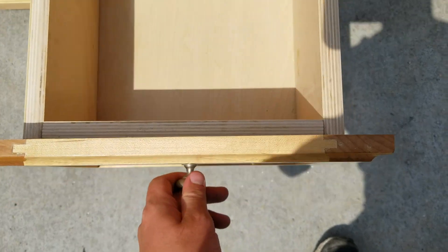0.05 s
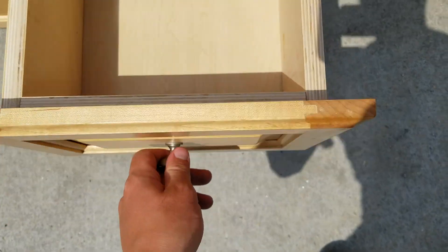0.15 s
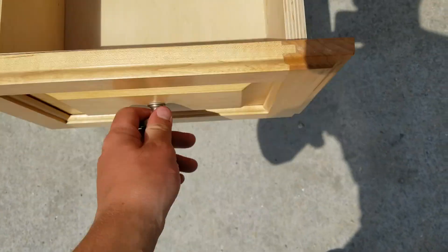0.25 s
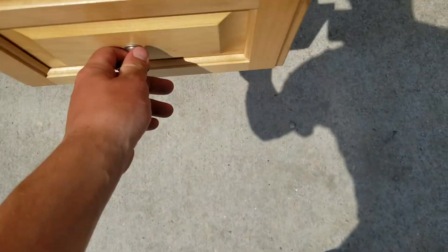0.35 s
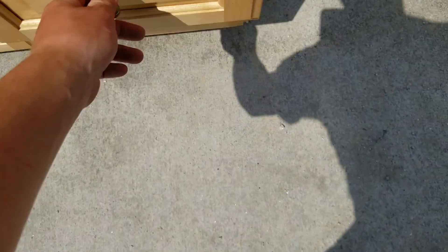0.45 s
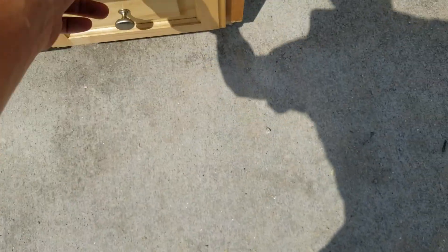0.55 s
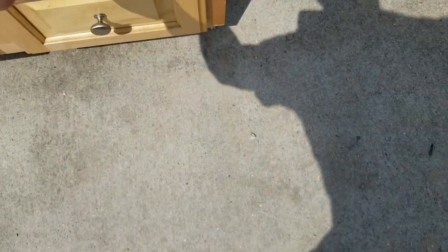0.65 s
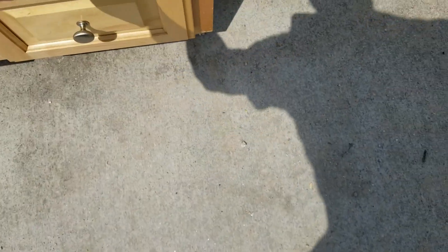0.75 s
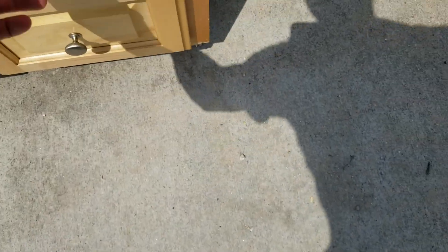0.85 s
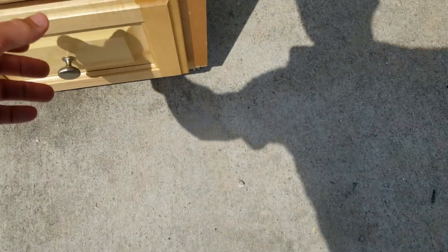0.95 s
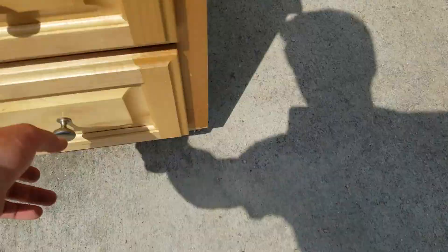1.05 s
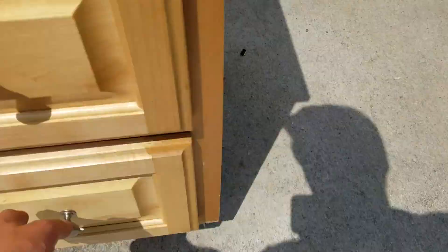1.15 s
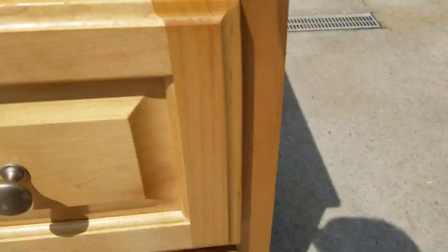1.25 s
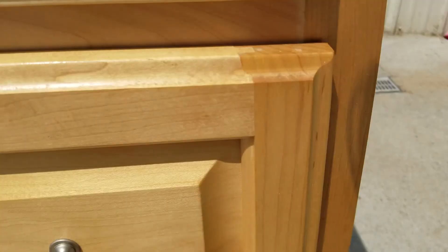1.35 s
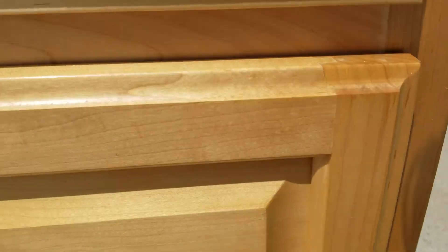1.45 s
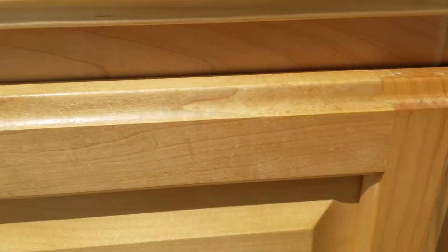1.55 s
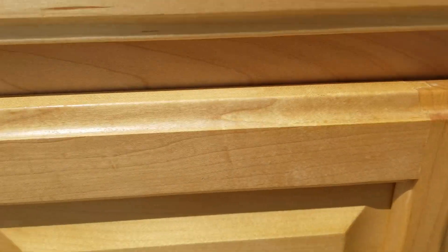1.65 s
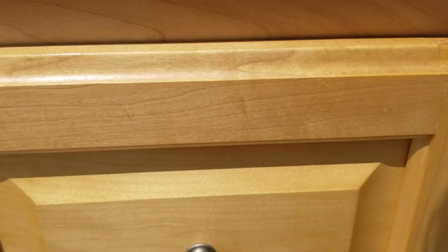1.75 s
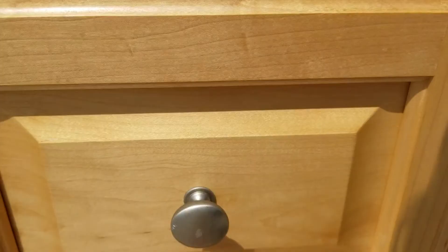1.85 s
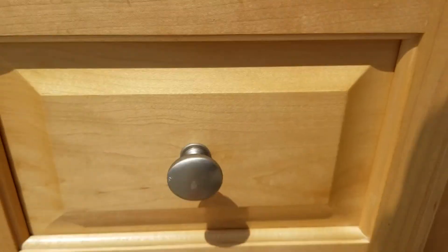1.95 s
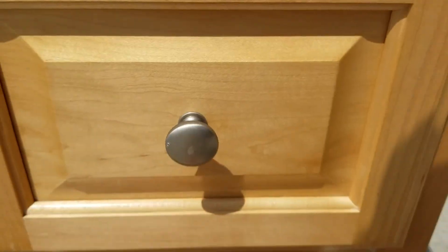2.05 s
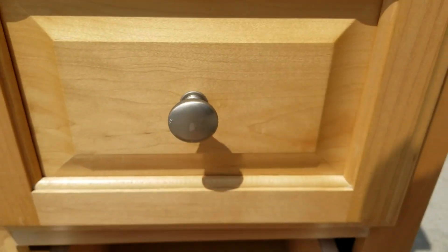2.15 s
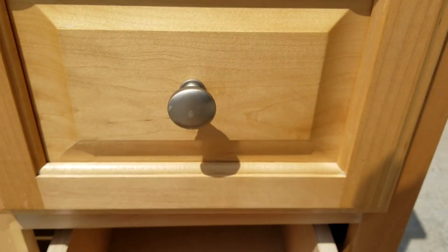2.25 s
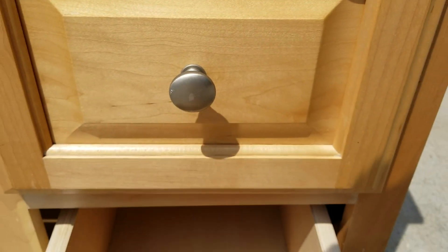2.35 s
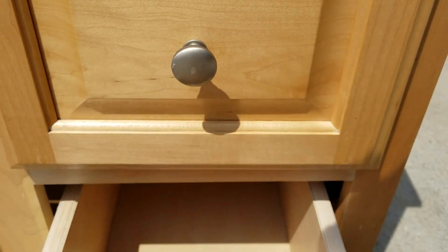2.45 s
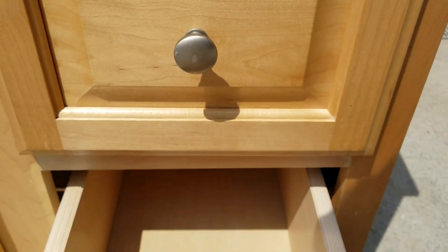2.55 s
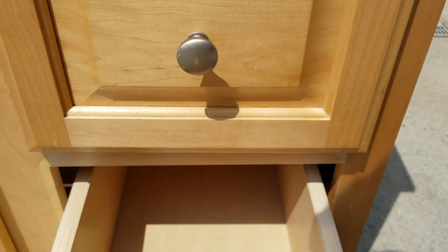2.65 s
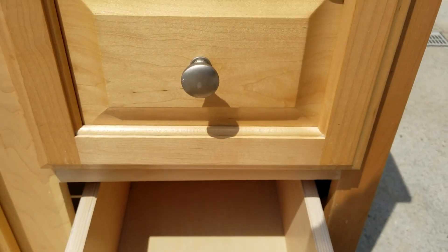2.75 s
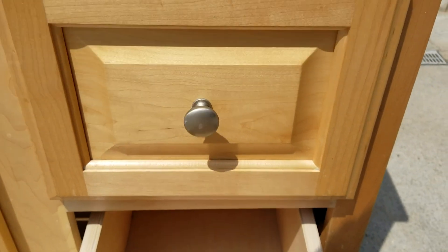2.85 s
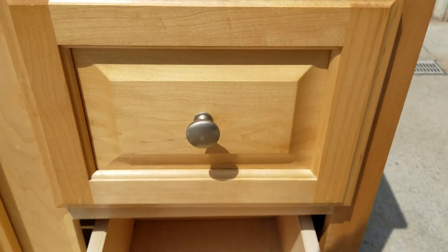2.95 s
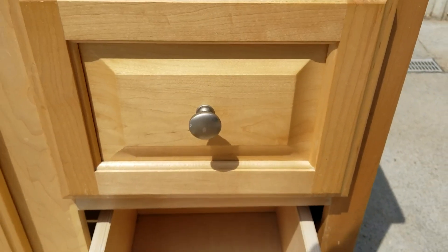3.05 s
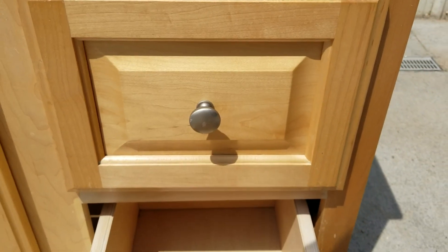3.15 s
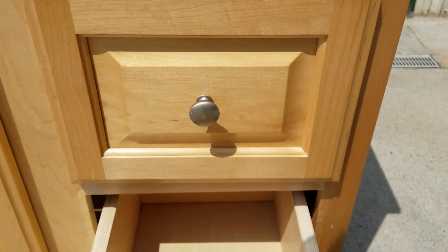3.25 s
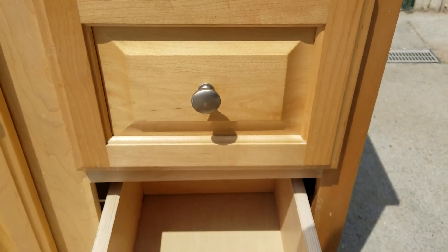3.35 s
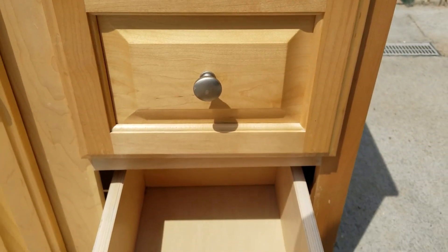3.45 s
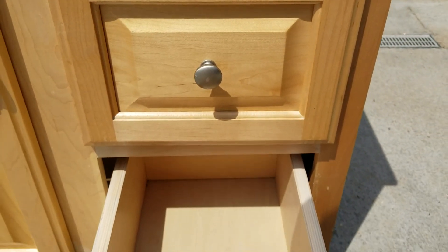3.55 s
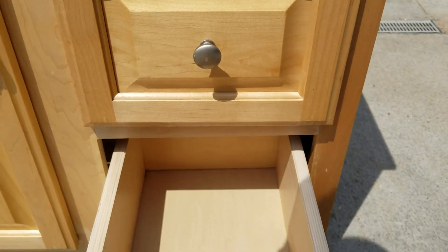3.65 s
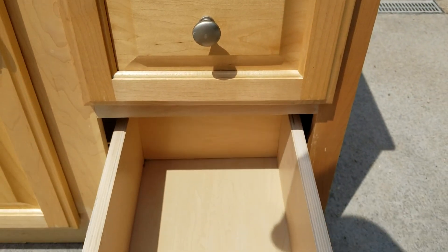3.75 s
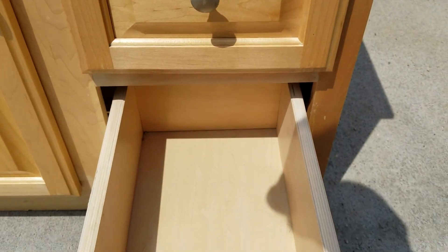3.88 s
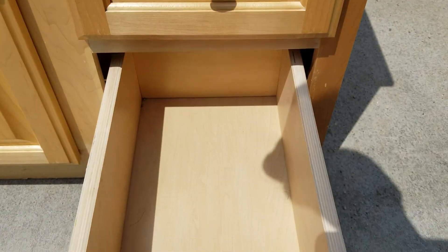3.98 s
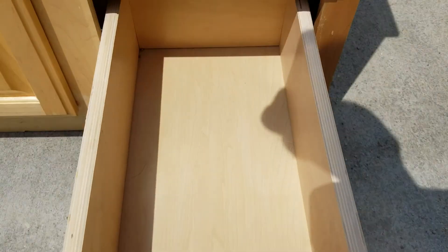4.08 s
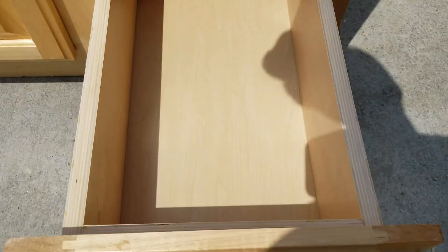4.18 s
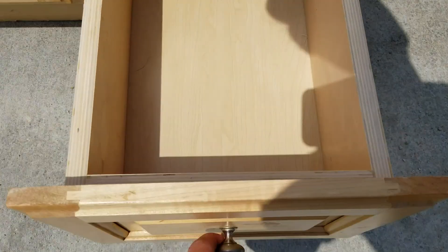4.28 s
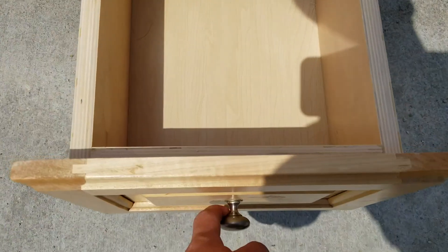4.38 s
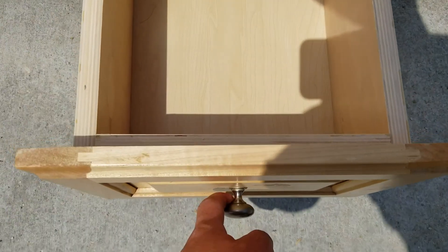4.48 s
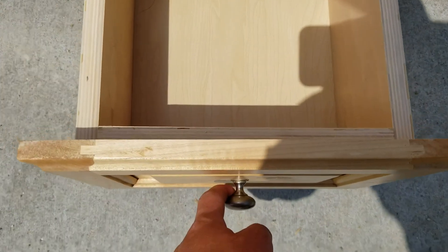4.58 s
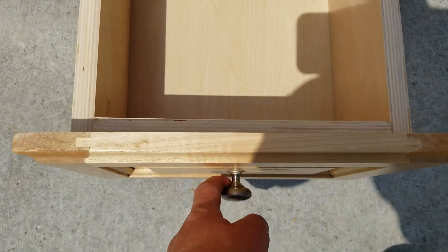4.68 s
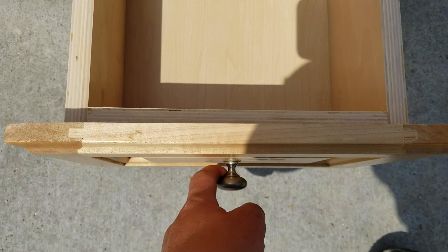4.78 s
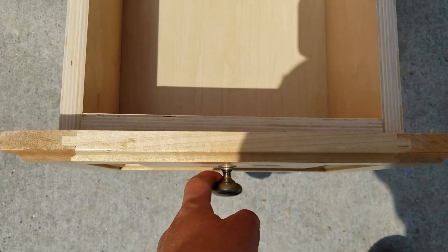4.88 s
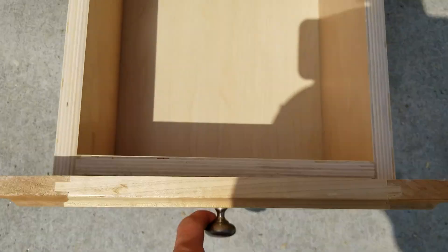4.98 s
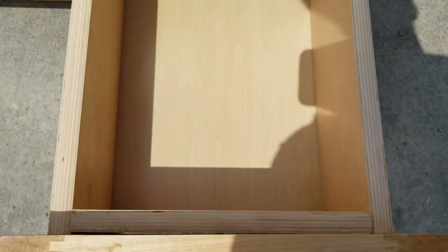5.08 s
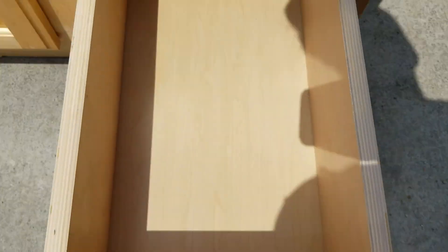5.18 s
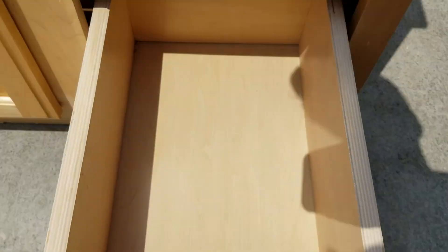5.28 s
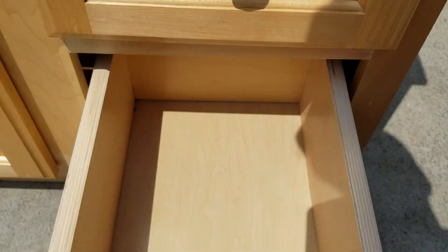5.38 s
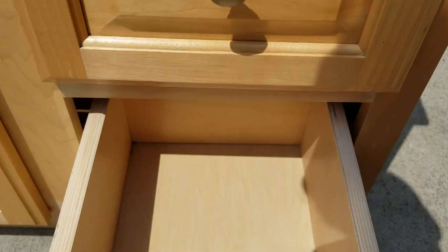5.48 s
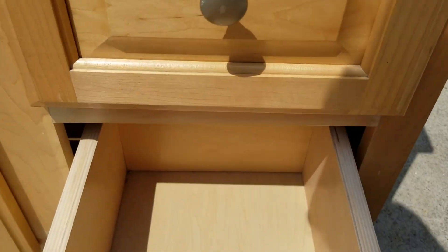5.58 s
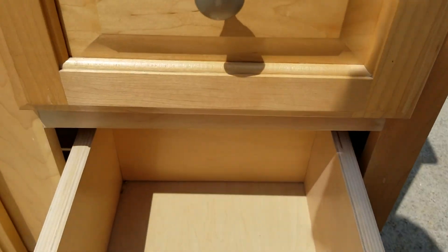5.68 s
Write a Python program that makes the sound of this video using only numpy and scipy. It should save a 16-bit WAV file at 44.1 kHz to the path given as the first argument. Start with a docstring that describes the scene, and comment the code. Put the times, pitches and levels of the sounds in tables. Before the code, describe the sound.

From the start, a wooden cabinet drawer scrapes inward, catching and rasping harder at about 0.3 seconds. At about 0.7 seconds it slams shut with a quick cluster of loud knocks and a short, low shudder, faintly echoed by the yard. Air buffets the microphone in low lumps until about 1.4 seconds, and fingers tap and rub close to it from 1 to 1.4 seconds. After a small scuff near 1.7 seconds, a lower drawer is drawn out from 2 seconds, gliding softly with little snags until about 2.8. It rests, then is pulled further from 3.5 to 4 seconds with a rumbling scrape, several wooden knocks over its stops and a tiny squeak. A few light clicks follow between 4.4 and 5.6 seconds, with a soft bump and rub near 5.5. Faint, steady outdoor noise lies underneath throughout.

```python
"""A top drawer scrapes inward, binds halfway and slams shut: a wooden cabinet, outdoors on concrete.
The wood catches and slips, each blow rings the cabinet, and the yard's walls answer faintly from a way off.
Fingers tap and rub close to the microphone, and air buffets it as it moves. Then a lower drawer is drawn
out, glides, rests, and is pulled on over its stops. Distant outdoor noise lies under it all."""
import sys
import numpy as np
from scipy import signal
from scipy.fft import rfft, irfft
from scipy.io import wavfile
from scipy.ndimage import uniform_filter1d

SR = 44100
rng = np.random.default_rng(int(sys.argv[2]) if len(sys.argv) > 2 else 0)


def unload_wav(signal):
    """Save mono or channel-first audio to the path in sys.argv[1] as 16-bit WAV at rate SR, clipped to [-1, 1]."""
    wavfile.write(
        sys.argv[1],
        SR,
        np.round(np.clip(np.atleast_2d(signal).T, -1, 1) * 32767).astype(np.int16),
    )


N = 252252

# How hard the hand drives each stroke. Each row: time in seconds, effort in dB.
PUSH_EFFORT = [(0, -43.5), (0.12, -38), (0.18, -33.5), (0.31, -33.5), (0.42, -36), (0.55, -41), (0.61, -42),
               (0.635, -47.5)]
DRAW_EFFORT = [(1.98, -61.5), (2.13, -46.5), (2.25, -44.5), (2.30, -47), (2.36, -39.5), (2.40, -47.5)]
GLIDE_EFFORT = [(2.41, -50), (2.62, -51), (2.78, -53)]
RUN_OUT_EFFORT = [(3.57, -55), (3.62, -47), (3.69, -45), (3.73, -34.5), (3.78, -42.5), (3.81, -30.5),
                  (3.86, -34.5), (3.92, -43), (4.05, -64)]
# Spectra of the strokes. Each row: frequency in Hz, relative density in dB.
PUSH_SPECTRUM = [(41, -39), (70, -4.5), (161, -1.5), (193, -2), (467, -9), (599, -2.5), (734, -19),
                 (920, -11), (1130, -20.5), (2030, -23), (3650, -37), (6140, -47), (7520, -60),
                 (10300, -46.5), (15500, -60.5)]
DRAW_SPECTRUM = [(47, -38), (80, -16), (133, -1.5), (216, -15), (257, -3), (436, -5), (556, -4),
                 (621, -2.5), (709, -13.5), (1050, -6), (1290, -14), (2040, -18), (6560, -42.5),
                 (7490, -55), (15500, -56)]
RUN_OUT_SPECTRUM = [(40, -21), (75, -4), (115, -5), (200, -10.5), (270, -2.5), (325, -10), (430, -1.5),
                    (540, -9.5), (780, -19), (1050, -19.5), (1400, -22.5), (2200, -23), (3400, -29.5),
                    (4200, -37), (7500, -48.5), (10000, -40), (15500, -43)]
# Resonances of the drawer boxes. Each row: frequency in Hz, width in Hz, lift in dB.
TOP_BOX_MODES = [(200, 21, 6), (268, 36, 9.5), (510, 11, 3), (613, 35, 5.5), (890, 59, 6.5),
                 (1300, 140, 5.5), (2050, 30, 6.5), (2330, 60, 5)]
LOWER_BOX_MODES = [(126.4, 8.3, 4.4), (261.6, 37, 5.26), (380, 43, 1.6), (429, 130, 6), (620, 20, 10.6),
                   (1105, 160, 7.7), (2020, 83, 8.4)]
# Spectra of the far background, air on the microphone, the yard's echo, struck panels and rubbed skin.
# Each row: frequency in Hz, relative density in dB.
AIR_SPECTRUM = [(15, -55.5), (25, -14), (69, -3), (140, -6.5), (178, -10.5), (246, -6), (281, -12),
                (433, -6), (848, -15), (919, -16), (1020, -14.5), (1270, -23), (2770, -26.5), (3930, -38),
                (7500, -43.5), (13500, -35.5), (15500, -41.5)]
BUFFET_SPECTRUM = [(20, -7.5), (45, -2), (75, 1.5), (130, -6), (220, -11), (500, -19.5), (1500, -64.5)]
YARD_SPECTRUM = [(60, -9), (250, -2), (1000, -2.5), (2500, -13.5), (5000, -3.5), (8000, 2.5), (15000, -8)]
PANEL_SPECTRUM = [(200, -12), (500, -2.5), (1050, 2), (1550, -2.5), (1950, 4), (2200, 2), (2500, 6),
                  (2950, 3), (3250, -3), (4050, -8.5), (4900, -5.5), (5700, -8.5), (6600, -16), (7500, -33),
                  (9200, -18.5), (12000, -25), (16000, -27)]
RUSTLE_SPECTRUM = [(200, -3), (700, -1), (1500, 1.5), (2700, -6.5), (4000, -12.5), (6000, -15), (8000, -26),
                   (12000, -14.5), (16000, -27.5)]
# How alike left and right are at the microphone. Each row: frequency in Hz, correlation.
WOOD_LIKENESS = [(60, 0.86), (300, 1), (700, 0.87), (1400, 0.35), (3000, 0.27), (15000, 0.084)]
AIR_LIKENESS = [(60, 0.61), (180, 0.96), (550, 0.42), (1650, -0.074), (4970, -0.46), (15000, -0.39)]
BUFFET_LIKENESS = [(20, .3), (70, 0.53), (200, 1), (1500, .5)]
# Decay of the echo and of the panels. Each row: frequency in Hz, seconds to fall 60 dB (t60).
YARD_DECAY = [(100, 0.18), (500, 1.1), (1200, 1), (3000, 2.5), (6000, 0.11), (14000, 0.2)]
PANEL_DECAY = [(300, 0.12), (1000, .1), (2500, 0.028), (5000, 0.031), (10000, 0.024), (16000, 0.024)]
# Gusts on the microphone and skin rubbing beside it. Each row: start and length in seconds, level in dB.
MIC_GUSTS = [(0, 1.415, -44.5), (5.49, 0.042, -57.5), (5.68, 0.04, -62.5)]
SKIN_RUBS = [(0.84, 0.18, -73), (1.03, 0.25, -55.5), (1.291, 0.064, -46), (5.486, 0.034, -53)]
# Dry taps of fingers, knob and runners. Each row: start in seconds, peak in dB before panning,
# pitch in Hz, chatter t60 in seconds, left over right in dB.
CLOSE_TAPS = [(0.07, -36, 650, 0.018, -12), (0.1165, -31, 1620, 0.037, -2), (0.432, -31, 6100, 0.029, -3),
              (0.5735, -18, 503, 0.065, 2), (0.609, -28.5, 540, 0.032, 0), (1.0381, -40, 2480, .015, -7.5),
              (1.0484, -24.5, 323, 0.0068, -17), (1.0698, -35, 2470, 0.0026, 9),
              (1.2052, -37.5, 2550, 0.045, 3), (1.2154, -22.5, 1070, 0.02, 0),
              (1.2863, -22, 2500, 0.016, 5), (1.299, -25, 560, 0.0072, 4), (1.336, -27.5, 2400, 0.012, 0),
              (1.3462, -17.5, 606, 0.012, 4), (1.3696, -35.5, 2620, 0.026, -1.5),
              (1.9364, -38, 1270, 0.017, -0.5), (2.313, -37.5, 2400, 0.02, 3),
              (3.6195, -31.5, 2144, 0.066, -3), (3.8290, -32, 3260, 0.079, -7),
              (4.3522, -50, 2094, 0.022, 2), (5.0510, -38, 2007, 0.044, 1.5), (5.1756, -47, 2146, .025, -4),
              (5.3853, -48, 1694, 0.016, 0.5), (5.4986, -44.5, 1880, .005, -5),
              (5.522, -49, 900, 0.0088, 0), (5.624, -38.5, 1290, 0.014, -5.5)]
# The cabinet's low modes. Each row: frequency in Hz, relative level in dB, t60 in seconds.
CABINET_MODES = [(62.2, -21.5, 0.049), (105, -7.5, 0.17), (121, -5, 0.67), (147.2, -4.5, 0.2),
                 (184.3, 1.5, 0.12), (235.2, -14.5, 0.51), (262, -3.5, 0.14), (334, 0.5, 0.066),
                 (393, -7, 0.063), (478.1, -8, 0.39), (520, -16, 0.13), (562, -21, 0.099), (588, -16, 0.21),
                 (719, -17.5, .2), (828, -24, 0.5), (955, -13.5, 0.11), (1026, -21, .18)]
# Blows on runners and stops. Each row: start in seconds, ring and crack gains in dB, treble cutoff in Hz.
DRAWER_BLOWS = [(0.292, -30, -25, 1200), (0.5716, -31.5, -21, 1380), (0.6592, -12.5, -9, 14000),
                (0.668, -28, -17.5, 4500), (0.6806, -16.5, -16.5, 2860), (0.6936, -14, -13, 3520),
                (0.7215, -34, -19, 1520), (3.47, -39.5, -43, 1160), (3.6189, -48, -33.5, 9100),
                (3.713, -39, -27.5, 1660), (3.757, -44, -29, 1210), (3.7885, -26, -26, 2300),
                (3.826, -41.5, -31.5, 13000), (3.831, -29.5, -27.5, 3720), (3.862, -37, -38, 1980),
                (5.499, -43.5, -53, 2500)]
# Snags of the lower drawer. Each row: start and length in seconds, scrape, rumble and rasp gains in dB.
DRAWER_SHIFTS = [(1.677, 0.12, -47.5, -50.5, -58.5), (2.429, .03, -56, -45, -62),
                 (2.528, .025, -44.5, -55, -81), (2.585, 0.032, -43, -51, -70),
                 (2.74, 0.055, -47, -67, -58), (3.47, 0.077, -49, -50.5, -63),
                 (3.63, 0.051, -47, -36, -48.5), (3.979, 0.026, -38, -48.5, -91)]
# Partials of the runner's squeak. Each row: start and length in seconds, pitch in Hz, level in dB.
SQUEAK_PARTIALS = [(3.915, 0.02, 3370, -50.5), (3.916, .02, 4550, -63)]


def amp(db):
    """Decibels to gain."""
    return 10 ** (np.asarray(db) / 20)


def unit_rms(x):
    """Scales to rms 1."""
    return x / np.sqrt(np.mean(x ** 2) + 1e-20)


def read(points, hz):
    """Reads a table on a log-frequency axis."""
    f, value = np.transpose(points)
    return np.interp(np.log(hz + 1), np.log(f + 1), value)


def bins(x):
    """Frequencies of the spectrum of x."""
    return np.fft.rfftfreq(x.shape[-1], 1 / SR)


def shaped(x, gain):
    """Filters with one gain per frequency."""
    return irfft(rfft(x) * gain, x.shape[-1])


def cut(x, hz, kind, order=2):
    """Causal low-pass or high-pass."""
    return signal.sosfilt(signal.butter(order, min(hz, SR / 2 - 1), kind, fs=SR, output="sos"), x)


def pan(db):
    """Stereo gains, left over right by db."""
    return amp(np.array([[db], [-db]]) / 2)


def add(mix, s, sound):
    """Mixes a stereo sound in at s seconds."""
    part = mix[:, max(round(s * SR), 0):][:, :sound.shape[1]]
    part += sound[:, :part.shape[1]]


def noise(spectrum, likeness, size):
    """Coloured stereo noise, partly alike in both channels."""
    left, other = rng.standard_normal((2, size))
    hz = bins(left)
    same = np.clip(read(likeness, hz), -1, 1)
    right = shaped(left, same) + shaped(other, np.sqrt(1 - same ** 2))
    return unit_rms(shaped(np.array([left, right]), amp(read(spectrum, hz))))


def wobble(size, span):
    """A random curve of rms 1, smoothed over span points."""
    return unit_rms(uniform_filter1d(rng.standard_normal(size), size=span))


def decay(t, t60):
    """Gain that falls 60 dB in t60 seconds."""
    return np.exp(-np.log(1000) * t / t60)


def dying(x, t60_table, count=9):
    """Lets every band of x die away at its own speed."""
    t, centres = np.arange(x.shape[1]) / SR, np.geomspace(60, 16000, count)
    bands = (shaped(x, read(np.c_[centres, share], bins(x))) for share in np.eye(count))
    return sum(band * decay(t, read(t60_table, hz)) for band, hz in zip(bands, centres))


def swells(rows, attack_s, release_s):
    """Gain that rises just before each event, holds for its length and dies away."""
    t, gain = np.arange(N) / SR, np.zeros(N)
    for s, length, db in rows:
        rise = np.clip(1 + (t - s) / attack_s, 0, 1)
        gain += amp(db) * rise * np.exp(-np.maximum(t - s - length, 0) / release_s)
    return gain


def slide(stroke, spectrum, box, scrape_db, rumble_db, rasp_db, slips_per_s, spread_db, catch_db,
          rasp_follow=1, boom_db_per_s=0, binds=False, bind_s=0.285, attack_s=0.0024, release_s=0.05):
    """Wood catches and slips on wood: uneven clicks ring the drawer box. Returns start and sound."""
    times, effort_db = np.transpose(stroke)
    start, end = times[0], times[-1]
    t = start + np.arange(65536) / SR
    strength = amp(spread_db * np.minimum(rng.exponential(1, len(t)), 4))
    # rough patches along the runner make the slips swell in bunches
    strength *= amp(catch_db * unit_rms(cut(rng.standard_normal(len(t)), 21, "low")))
    slips = strength * rng.choice([-1, 1], len(t)) * (rng.random(len(t)) < slips_per_s / SR)
    hz = bins(slips)
    # bass reaches both sides alike; in the treble each side gets its own strength and sign
    scattered = slips * rng.standard_normal((2, len(t)))
    same = np.clip(read(WOOD_LIKENESS, hz), 0, 1)
    drive = shaped(slips, np.sqrt(same)) + shaped(scattered, np.sqrt(1 - same))
    # above the few strong resonances, crowded panel modes ripple the response
    ripple_db = 3 * wobble(len(hz), span=110) * hz ** 2 / (hz ** 2 + 700 ** 2)
    modes_db = sum(db / (1 + (2 * (hz - f) / width) ** 2) for f, width, db in box)
    body = amp(read(spectrum, hz) + ripple_db + modes_db)
    low = 1 / (1 + (hz / 350) ** 6)
    high = 1 - 1 / (1 + (hz / 1500) ** 6)
    fine = 1 - 1 / (1 + (hz / 7000) ** 8)
    effort, top = np.interp(t, times, effort_db), effort_db.max()
    # once bound, the drawer scrapes and rasps harder; the first bite is the hardest
    bound = binds * np.clip((t - bind_s) / 0.028, 0, 1)
    bite_db = bound * (8 + 5 * np.exp(-abs(t - bind_s) / 0.028))
    treble_db = rasp_db + 14.5 * bound
    boom_db = boom_db_per_s * (t - times.mean())  # the box booms more the further it hangs out
    bands = [(low, effort + rumble_db + boom_db),
             (1 - low - high, effort + scrape_db + bite_db),
             (high * (1 - fine), top + rasp_follow * (effort - top) + treble_db),
             (fine, effort + treble_db - 15.5)]  # the finest grain fizzes
    moving = np.interp(t, [start, start + attack_s, end, end + release_s], [0, 1, 1, 0])
    return start, moving * sum(unit_rms(shaped(drive, body * share)) * amp(db) for share, db in bands)


def outdoors(level_db=-54.5):
    """A steady distant wash with a thin hiss on top."""
    return noise(AIR_SPECTRUM, AIR_LIKENESS, N) * amp(level_db) * pan(1)


def buffeting():
    """Air hits the microphone in low, uneven lumps while it is moved about."""
    lumps = amp(unit_rms(cut(rng.standard_normal(N), 14, "low")))
    wind = unit_rms(noise(BUFFET_SPECTRUM, BUFFET_LIKENESS, N) * lumps)
    return wind * swells(MIC_GUSTS, attack_s=0.022, release_s=0.12) * pan(3.7)


def yard_echo(x, echo_db=-23, build_s=0.02):
    """Walls some way off return a faint, long tail."""
    tail = dying(noise(YARD_SPECTRUM, AIR_LIKENESS, size=60000), YARD_DECAY)
    t = np.arange(tail.shape[1]) / SR
    tail *= 1 - np.exp(-(t / build_s) ** 2)
    return amp(echo_db) * signal.fftconvolve(x, tail / np.linalg.norm(tail[0]), axes=1)[:, :N]


def tap(peak_db, hz, chatter_t60, pan_db, soft_hz=3400, size=4096):
    """Close up, a click and its brief chatter ring one resonance, softened by the fingertip."""
    t = np.arange(size) / SR
    touch = 0.35 * rng.standard_normal((2, size)) * decay(t, chatter_t60)
    touch[:, 0] += 2  # the click
    sharpness = 1 + 0.091 * hz * chatter_t60  # flesh thuds, a hard contact rings
    ring = signal.lfilter(*signal.iirpeak(hz, sharpness, fs=SR), touch)
    crisp_edge = 0.18 * cut(touch, 2 * hz, "low", order=1) * hz / SR
    sound = cut(ring, min(2 * hz, soft_hz), "low") + crisp_edge
    return amp(peak_db) * pan(pan_db) * sound / abs(sound).max()


def knock(ring_db, crack_db, dull_hz, seat_s=0.18, full_blow_db=-10):
    """A blow rings the cabinet's low modes and the crowded upper modes of its panels."""
    t = np.arange(20000) / SR
    ring = -sum(amp(db) * np.sin(2 * np.pi * hz * t) * decay(t, t60) for hz, db, t60 in CABINET_MODES)
    ring *= np.exp(-(t / seat_s) ** 4)  # the drawer settles against the frame and chokes the ring
    sound = np.tile(amp(ring_db) * ring, (2, 1))
    crack = dying(noise(PANEL_SPECTRUM, WOOD_LIKENESS, size=6000), PANEL_DECAY)
    add(sound, 0, amp(crack_db) * crack)
    # a soft blow lacks treble; a light one cannot move the whole cabinet and loses bass
    thin_hz = 62 * 2 ** ((full_blow_db - ring_db) / 10)
    return cut(cut(sound, dull_hz, "low", order=3), thin_hz, "high")


def judder(level_db=-20, mode_hz=122.4, excess_hz=30, sag_s=0.045):
    """The slammed drawer shakes, sagging onto a low cabinet mode and rattling once a swing, then grips."""
    corners = np.cumsum([0, 0.026, 0.06, 0.042])  # attack, hold and release in seconds
    t = np.arange(0, corners[-1], 1 / SR)
    rate_hz = mode_hz + excess_hz * np.exp(-t / sag_s)
    swing = np.sin(2 * np.pi * np.cumsum(rate_hz) / SR)
    rattle = noise(RUSTLE_SPECTRUM, WOOD_LIKENESS, size=16384)[:, :len(t)]
    rattle *= (1 + swing / 2) * decay(t, t60=0.4) * np.interp(t, corners, [1, 1, 1, 0])
    return amp(level_db) * (swing * np.interp(t, corners, [0, 1, 1, 0]) + amp(-24) * rattle)


def rubbing(grain_db=3.5, ticks_per_s=16, tick_hz=1710):
    """Skin rubs right by the microphone: a grainy rustle with faint ticks of skin and nail."""
    grain = amp(grain_db * wobble(N, span=90))
    rustle = unit_rms(noise(RUSTLE_SPECTRUM, AIR_LIKENESS, N) * grain)
    rustle *= swells(SKIN_RUBS, attack_s=0.019, release_s=0.02)
    for s, length, _ in SKIN_RUBS:
        for when, height in rng.random((int(length * ticks_per_s), 2)):
            tick = tap(peak_db=-41.5, hz=tick_hz * 2 ** (height - 0.5), chatter_t60=0.017, pan_db=0)
            add(rustle, s + when * length, tick)
    return rustle


def shift(s, length_s, scrape_db, rumble_db, rasp_db, edge_db=-10):
    """A very short stroke of the lower drawer swells and eases off."""
    stroke = [(s, edge_db), (s + 0.22 * length_s, 0), (s + length_s, edge_db)]
    return slide(stroke, RUN_OUT_SPECTRUM, LOWER_BOX_MODES, scrape_db, rumble_db, rasp_db,
                 slips_per_s=4400, spread_db=-0.9, catch_db=-0.5, release_s=0.0083)


def squeak(length_s, hz, db, waver=0.02):
    """The runner sticks and slips in a brief, unsteady tone as the drawer slows."""
    size = round(length_s * SR)
    pitch = hz * (1 + waver * wobble(size, span=60))
    tone = np.sin(2 * np.pi * np.cumsum(pitch) / SR)
    return np.tile(amp(db) * np.hanning(size) * tone, (2, 1))


def drawers(right_lag_s=0.00024):
    """Both drawers slide and knock, a little to the left of the microphone."""
    wood = np.zeros((2, N))
    add(wood, *slide(PUSH_EFFORT, PUSH_SPECTRUM, TOP_BOX_MODES, scrape_db=-5, rumble_db=0,
                     rasp_db=-22.5, slips_per_s=7000, spread_db=1, catch_db=1.5,
                     rasp_follow=0.83, binds=True))
    add(wood, *slide(DRAW_EFFORT, DRAW_SPECTRUM, LOWER_BOX_MODES, scrape_db=-2, rumble_db=-8.5,
                     rasp_db=-12.5, slips_per_s=6000, spread_db=0, catch_db=1.4,
                     rasp_follow=0.38, attack_s=0.017))
    add(wood, *slide(GLIDE_EFFORT, RUN_OUT_SPECTRUM, LOWER_BOX_MODES, scrape_db=0.5, rumble_db=-2,
                     rasp_db=-7, slips_per_s=5500, spread_db=1.5, catch_db=1.4,
                     rasp_follow=0.53, release_s=0.079))
    add(wood, *slide(RUN_OUT_EFFORT, RUN_OUT_SPECTRUM, LOWER_BOX_MODES, scrape_db=2.6, rumble_db=-4,
                     rasp_db=-18.5, slips_per_s=3200, spread_db=2, catch_db=2.3,
                     rasp_follow=0.98, boom_db_per_s=28))
    for row in DRAWER_SHIFTS:
        add(wood, *shift(*row))
    for s, *blow in DRAWER_BLOWS:
        add(wood, s, knock(*blow))
    for s, *partial in SQUEAK_PARTIALS:
        add(wood, s, squeak(*partial))
    add(wood, 0.70, judder())
    # the body of the sound is stronger on the left; the right side hears it all a moment later
    wood += (pan(3.2) - 1) * cut(wood, 1500, "low", order=1)
    lags_s = np.array([[0], [right_lag_s]])
    return shaped(wood, np.exp(-2j * np.pi * bins(wood) * lags_s))


def scene():
    """Open air far off, the cabinet and its echo, and dry handling sounds at the microphone."""
    air, wood = outdoors(), drawers()
    mix = air + wood + yard_echo(wood) + buffeting() + rubbing()
    for s, *touch in CLOSE_TAPS:
        add(mix, s, tap(*touch))
    return mix


def record(dry, edge_hz=15850):
    """The loudest peaks are rounded off at full scale, then the highest treble is cut."""
    rounded = dry / (1 + dry ** 6) ** (1 / 6)
    low_pass = signal.firwin(511, edge_hz, window=("kaiser", 9), fs=SR)
    return signal.oaconvolve(rounded, low_pass[None], "same")


dry = scene()
out = record(dry)
unload_wav(out)
```